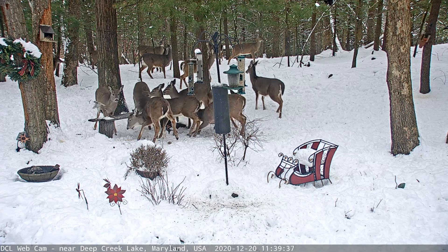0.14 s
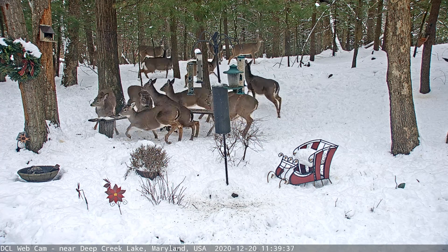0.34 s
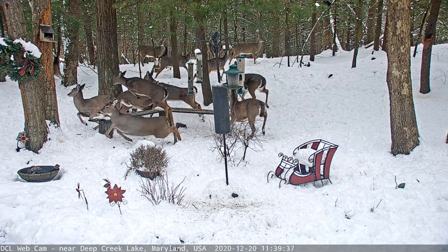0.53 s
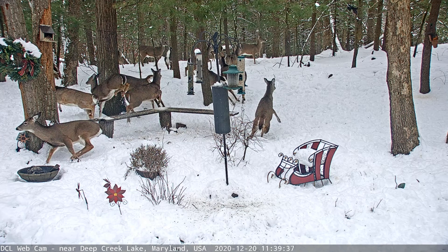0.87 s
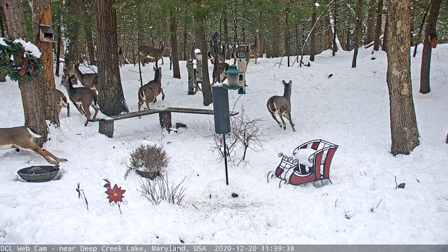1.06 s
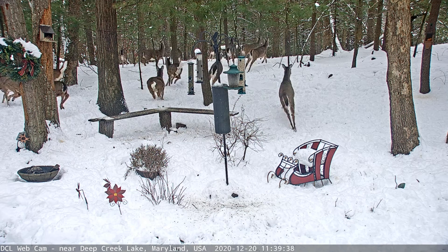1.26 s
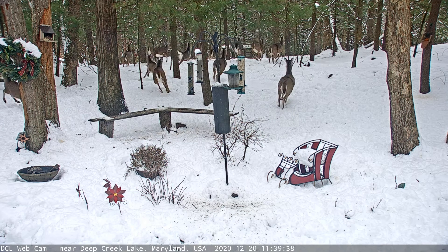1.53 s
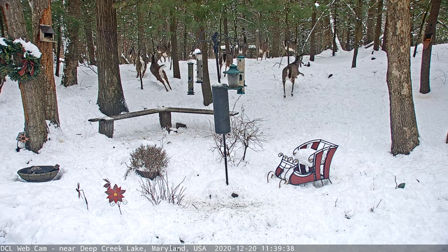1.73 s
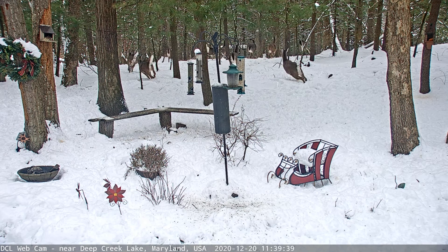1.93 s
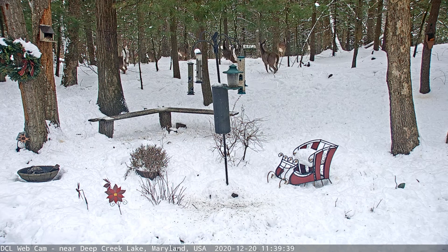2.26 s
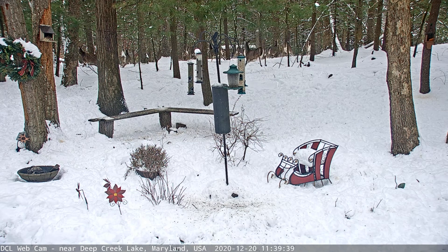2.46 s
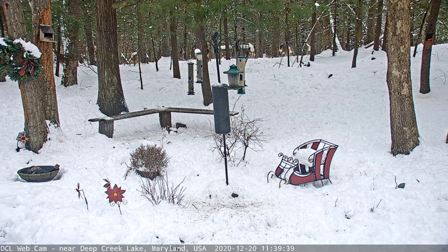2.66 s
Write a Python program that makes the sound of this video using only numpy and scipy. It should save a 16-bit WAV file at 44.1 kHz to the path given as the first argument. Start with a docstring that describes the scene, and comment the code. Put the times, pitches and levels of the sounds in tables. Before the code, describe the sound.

Close outdoor microphone with limited treble: crusty snow crunches like deer footfalls, lumps knock a roof, a heavy ice sheet rumbles and scrapes down in an overloaded roar, then late thumps and crackling over thinning hiss.

```python
"""Close to an outdoor camera, icy snow hisses and crunches in gritty noise bursts, with a few ringing ice chips,
dull low thumps like footfalls, and a deep throb that shakes the microphone.
Lumps then knock the roof, and a sheet of snow and ice breaks loose: the roof resonances drum and rumble
under random bumps and scrapes, the noise-grain hiss swells, and the narrow-band microphone clips.
Dull low thumps return as the slide ends and after it; crunches and chips crackle on over thinning hiss."""
import sys
import numpy as np
from scipy import signal
from scipy.fft import rfft, irfft, next_fast_len
from scipy.io import wavfile
from scipy.ndimage import uniform_filter1d, map_coordinates

SR = 44100
rng = np.random.default_rng(int(sys.argv[2]) if len(sys.argv) > 2 else 0)


def to_wav(sig):
    """Store sig (one row per channel, or 1-D mono) as 16-bit WAV at the path in sys.argv[1].

    Samples outside -1..1 are clipped; the rate is SR.
    """
    pcm = np.clip(np.atleast_2d(sig), -1, 1) * 32767
    pcm = np.round(pcm).astype(np.int16)
    wavfile.write(sys.argv[1], SR, pcm.T)  # frames by channels


N = 125685  # length in samples


def amp(db):
    """dB to gain."""
    return 10 ** (np.asarray(db) / 20)


def unit(x):
    """Scale to rms 1."""
    return x / np.sqrt(np.mean(x ** 2) + 1e-20)


def along(points, hz):
    """Read (freq_hz, value) points on a log frequency axis."""
    freq_hz, value = np.transpose(points)
    return np.interp(np.log(hz + 1), np.log(freq_hz + 1), value)


def level(rows):
    """Gain per sample from (time_s, level_db) rows; silent outside them unless they reach the scene's ends."""
    time_s, level_db = np.transpose(rows)
    before = level_db[0] if time_s[0] < .05 else -120
    after = level_db[-1] if time_s[-1] > 2.8 else -120
    return amp(np.interp(np.arange(N) / SR, time_s, level_db, left=before, right=after))


def wobble(rate):
    """A smooth random curve with rate knots a second."""
    knots = rng.standard_normal(int(N * rate / SR) + 4)
    return map_coordinates(knots, [np.arange(N) * rate / SR])


def filtered(x, response):
    """Multiply the spectrum of x by a response of frequency."""
    size = next_fast_len(N + SR // 2)
    hz = np.fft.rfftfreq(size, 1 / SR)
    return irfft(rfft(x, size) * response(hz), size)[..., :N]


def coloured(x, spectrum):
    """Shape x with a spectrum that rolls off at both ends, at rms 1."""
    lo, hi = spectrum[0][0], spectrum[-1][0]

    def response(hz):
        low_edge = 1 / (1 + (lo / 2 / (hz + 1)) ** 4)
        high_edge = 1 / (1 + (hz / (1.4 * hi)) ** 8)
        return amp(along(spectrum, hz)) * low_edge * high_edge

    return unit(filtered(x, response))


def grit(per_s, spread_db, smooth_share):
    """Random clicks of uneven size mixed with smooth noise, which takes smooth_share of the power."""
    chance = rng.random(N)
    size, sign, smooth = rng.standard_normal((3, N))
    clicks = unit((chance < per_s / SR) * amp(spread_db * size) * np.sign(sign))
    return np.sqrt(1 - smooth_share) * clicks + np.sqrt(smooth_share) * smooth


def patchy(x, depth_db, size):
    """Give x random gain in patches of time and frequency, using frames of size samples."""
    frames = signal.stft(x, nperseg=size)[2]
    field = uniform_filter1d(rng.standard_normal(frames.shape), size=3, axis=0)
    field = uniform_filter1d(field, size=4, axis=1)
    return unit(signal.istft(frames * amp(depth_db * unit(field)), nperseg=size)[1][:N])


def struck(rows, t60_s):
    """A dying sine for each (start_s, peak_db, pitch_hz)."""
    t = np.arange(N) / SR
    tones = np.zeros(N)
    for start_s, peak_db, pitch_hz in rows:
        decay = amp(peak_db - 60 * np.abs(t - start_s) / t60_s)
        tones += (t >= start_s) * decay * np.sin(2 * np.pi * pitch_hz * (t - start_s))
    return tones


def clip(x, top, hard):
    """Flatten what passes the top; a higher hard makes a sharper corner."""
    return x / (1 + np.abs(x / top) ** hard) ** (1 / hard)


# deep throb over time: [time_s, level_db]
THROB_LEVEL = [(0.0, -21.5), (0.2, -35.5), (0.38, -18.5), (0.52, -31.5), (.7, -14.5), (1.7, -10),
               (2.03, -16.5), (2.15, -13), (2.4, -22), (2.5, -18), (2.67, -28.5), (2.85, -30.5)]
# relative spectrum of the noise behind the throb: [freq_hz, density_db per Hz]
THROB_SPECTRUM = [(14, -6), (28, -1.5), (50, -5), (100, -22.5)]
THROB_EVEN = 0.34  # 0 swings like noise, 1 nearly steady


def throb():
    """Deep noise divided by part of its own envelope, so it swings more steadily than plain noise."""
    sway = coloured(rng.standard_normal(N), THROB_SPECTRUM)
    even = sway / (np.abs(signal.hilbert(sway)) + .2) ** THROB_EVEN
    top_hz = THROB_SPECTRUM[-1][0]
    return unit(filtered(even, lambda hz: 1 / (1 + (hz / top_hz) ** 6))) * level(THROB_LEVEL)


# low rumble that outlasts the slide: [time_s, level_db], before its swell
RUMBLE_LEVEL = [(0, -45), (.2, -49), (.25, -30.5), (.5, -39), (.55, -24.5), (.72, -20), (1.5, -2.5),
                (2.02, -20), (2.25, -24.5), (2.35, -30.5), (2.57, -34.5), (2.85, -47)]
# relative rumble spectrum: [freq_hz, density_db per Hz]
RUMBLE_SPECTRUM = [(60, -4), (100, 1.5), (160, -3.5), (400, -7), (560, -33.5)]


def rumble():
    """Low noise around the slide, swelling at random."""
    swell = amp(1.63 * wobble(20))
    return coloured(rng.standard_normal(N), RUMBLE_SPECTRUM) * level(RUMBLE_LEVEL) * swell


# hiss of moving snow: [time_s, level_db], before its flutter
HISS_LEVEL = [(0, -30.5), (.3, -27), (.47, -25), (.56, -30), (.62, -21.5), (.7, -15), (.85, -4), (1.4, 0.5),
              (1.95, -8), (2.1, -10), (2.2, -17.5), (2.33, -17), (2.4, -20.5), (2.52, -22), (2.69, -29.5),
              (2.85, -31)]
# relative hiss spectrum: [freq_hz, density_db per Hz]
HISS_SPECTRUM = [(260, -62), (450, -24), (835, -15.5), (983, -19), (2770, -13.5), (5330, -5.5),
                 (7300, -1.5), (9490, -5.5), (16100, -120)]
# icy grains, shared with the crunches; GRAIN_SHARE is the clicks' part of the power
GRAINS_PER_S, GRAIN_SPREAD_DB, GRAIN_SHARE = 4000, 4.5, 0.36
HISS_PATCH_DB, HISS_FLUTTER_DB = 1.5, 0.5


def hiss():
    """Fine icy grains of moving snow, patchy and fluttering in strength."""
    grains = grit(GRAINS_PER_S, GRAIN_SPREAD_DB, 1 - GRAIN_SHARE)
    fine = patchy(coloured(grains, HISS_SPECTRUM), HISS_PATCH_DB, size=128)
    flutter = amp(HISS_FLUTTER_DB * (wobble(30.1) + wobble(120)))
    return fine * level(HISS_LEVEL) * flutter


# crunches of crusted snow: [start_s, nominal peak_db, rise_s, t60_s, body_db (dull body against bright top)]
CRUNCH_BURSTS = [(0.069, -10, 0.0012, 0.024, -3), (0.096, -9, 0.001, .025, -8),
                 (0.111, -10, 0.0018, 0.045, -9), (0.168, -4, 0.0006, 0.042, 2),
                 (0.195, -14, 0.005, 0.076, 0), (0.216, -1, .012, 0.15, -2.5),
                 (0.235, -4.5, 0.0024, 0.1, -2.5), (.26, 2, 0.008, 0.078, 3.5),
                 (0.304, -6, 0.0024, 0.028, -13), (0.311, 0, 0.0063, 0.08, 2),
                 (0.342, -6.5, 0.0011, 0.071, -13), (0.354, -6.5, 0.0052, 0.18, 3),
                 (0.381, 0, 0.004, 0.078, 9), (0.4048, 1.5, 0.00078, 0.077, -12.5),
                 (0.423, -3.5, 0.0022, .06, 2), (0.504, -3, 0.0022, 0.066, -4),
                 (0.517, -10.5, 0.0033, 0.13, 5), (.592, -12.5, 0.0016, 0.23, 6),
                 (2.03, 16.5, 0.0035, 0.042, 10.5), (2.286, 3.5, 0.0025, 0.042, -18),
                 (2.529, -3.5, 0.00056, 0.053, -4.5), (2.561, -8, 0.0031, 0.04, -10),
                 (2.596, -13, 0.0022, 0.044, -2), (2.62, -12, 0.0027, 0.1, -17),
                 (2.641, -10.5, 0.0018, .07, -7.5), (2.653, -9, 0.0015, 0.063, -18),
                 (2.67, -8, 0.0018, 0.053, -7), (2.699, -14, 0.0026, 0.093, -7),
                 (2.715, -14, 0.0027, 0.13, -4), (2.758, -11, 0.002, 0.06, 0),
                 (2.782, -17.5, 0.0047, 0.066, 12), (2.823, -6, 0.001, 0.032, -9.5)]
# relative spectrum of the crunch grains before the body balance: [freq_hz, density_db per Hz]
CRUNCH_SPECTRUM = [(300, -30), (560, -21.5), (800, -10), (1800, -10.5), (3200, -11), (4800, -4),
                   (6500, 0.5), (7300, 1)]
CREST_DB = 6  # allowance for noise peaks above rms
CRUNCH_PATCH_DB, CRUNCH_GRIT_DB = 3, 2.5
BODY_HZ = 3000  # split between dull body and bright top


def crunches():
    """Crusted snow in short gritty bursts: a quick rise, then a fall; each has its own share of dull body."""
    t = np.arange(N) / SR
    top_power, body_power = np.zeros(N), np.zeros(N)
    for start_s, peak_db, rise_s, t60_s, body_db in CRUNCH_BURSTS:
        age = np.maximum(t - start_s, 0)
        rise = 1 - np.exp(-(age / rise_s) ** 2)
        power = (amp(peak_db - CREST_DB - 60 * age / t60_s) * rise) ** 2
        top_power += power
        body_power += power * amp(2 * body_db)
    grains = grit(GRAINS_PER_S, GRAIN_SPREAD_DB, 1 - GRAIN_SHARE)
    texture = patchy(coloured(grains, CRUNCH_SPECTRUM), CRUNCH_PATCH_DB, size=128)
    body = filtered(texture, lambda hz: 1 / (1 + (hz / BODY_HZ) ** 4))
    bursts = (texture - body) * np.sqrt(top_power) + body * np.sqrt(body_power)
    return bursts * amp(CRUNCH_GRIT_DB * wobble(610))


# ice chips that ring: [start_s, peak_db, pitch_hz]
CHIP_HITS = [(.135, -17.5, 4650), (.428, -16, 1970), (2.291, -7.5, 5470), (2.53, -7.5, 5360)]


def chips():
    """Ice chips ring briefly, each at a single high pitch."""
    return struck(CHIP_HITS, t60_s=.025)


# dull low thumps: [start_s, peak_db, pitch_hz]
THUMP_HITS = [(.233, -14, 113), (.355, -21, 120), (1.978, -7.5, 327), (2.167, -2.5, 328), (2.438, -23, 84),
              (2.487, -16.5, 83), (2.546, -17, 132), (2.7, -23, 110), (2.77, -31.5, 401)]


def thumps():
    """Dull low dying sines, first under the early crunches like footfalls, later as the slide ends and after."""
    return struck(THUMP_HITS, t60_s=.09)


# the sheet on the roof: [time_s, rumble_db, upper_db (upper resonances against the rumble)], before its swell
SLIDE_LEVEL = [(0.559, -27, 2), (.6, -15.5, -6), (.64, -12.5, -2.5), (0.677, -6.5, -2), (.85, 0, -4),
               (1.14, 2, -0.5), (1.39, 1, 0.5), (1.55, -2.5, 4), (1.72, -4.5, 3), (1.8, -12, 5),
               (1.886, -16, 4), (1.99, -8, 2), (2.145, -9.5, -2.5), (2.162, -30.5, 9), (2.175, -13, 3.5),
               (2.215, -34, -3)]
# relative roof resonances: [pitch_hz, width_hz, level_db]
ROOF_MODES = [(101.6, 102, -5), (161, 77, 1), (289.7, 81.5, 1.5), (394.4, 70, 1.5), (481, 100, -6),
              (766, 109, -6.5), (923, 120, -6.5), (1383, 124, -5), (1591, 147, -5.5), (1996, 460, -12),
              (2665, 360, -10)]
# single lumps knocking the roof: [start_s, peak_db]
KNOCK_HITS = [(0.5356, -7.5), (0.5424, -16), (0.567, -9.5), (0.5922, -6.5), (0.6061, -9), (0.615, -7),
              (2.1745, -11.5)]
LUMPS_PER_S, LUMP_SPREAD_DB = 900, 4.5
SCRAPE_SHARE = 0.82  # smooth scraping's part of the push power
SLIDE_PATCH_DB, SLIDE_SWELL_DB = 2, 1
ROOF_DULL_HZ, UPPER_HZ = 2700, 600  # softness of the push; split between rumble and upper resonances
CONTACT_S = 0.0011  # time a knocking lump touches the roof


def roof_ring(hz):
    """Response of the roof: resonances side by side with alternating sign."""
    total = 0
    for k, (pitch_hz, width_hz, level_db) in enumerate(ROOF_MODES):
        damping = 1j * hz * width_hz
        total = total + (-1) ** k * amp(level_db) * damping / (pitch_hz ** 2 - hz ** 2 + damping)
    return total


def roof_slide():
    """Lumps bumping and ice scraping along the roof push softly on its resonances."""
    push = patchy(grit(LUMPS_PER_S, LUMP_SPREAD_DB, SCRAPE_SHARE), SLIDE_PATCH_DB, size=512)
    drumming = unit(filtered(push, lambda hz: roof_ring(hz) / (1 + 1j * hz / ROOF_DULL_HZ) ** 2))
    upper = filtered(drumming, lambda hz: 1 / (1 + (UPPER_HZ / (hz + 1)) ** 6))
    time_s, rumble_db, upper_db = np.transpose(SLIDE_LEVEL)
    low_gain = level(np.c_[time_s, rumble_db])
    upper_gain = level(np.c_[time_s, rumble_db + upper_db])
    moving = (drumming - upper) * low_gain + upper * upper_gain
    return moving * amp(SLIDE_SWELL_DB * wobble(24.92))


def roof_knocks():
    """Each single lump gives the roof a short rounded push that rings the same resonances."""
    t = np.arange(N) / SR
    contact = (t < CONTACT_S) * np.sin(np.pi * t / CONTACT_S) ** 2
    knock = filtered(contact, roof_ring)[:SR // 4]
    blows = np.zeros(N)
    for start_s, peak_db in KNOCK_HITS:
        blows[round(start_s * SR)] = amp(peak_db)
    return signal.fftconvolve(blows, knock / np.abs(knock).max())[:N]


def scene():
    """Mix all sources to mono, from the background to the roof."""
    background = throb() + rumble()
    details = hiss() + crunches() + chips() + thumps()
    return (background + details + roof_slide() + roof_knocks())[None]


# treble limit of the microphone: [freq_hz, gain_db]
MIC_TREBLE = [(7200, 1.5), (7900, -17.5), (8700, -22), (9200, -40), (9600, -80)]
INPUT_CLIP, INPUT_HARD, OUTPUT_CLIP, OUTPUT_HARD = 0.55, 16, 0.72, 11
COUPLING_HZ, TOP_HZ = 20.6, 15850  # bass roll-off and final treble cutoff


def record(dry):
    """The input clips and sags through its coupling, the narrow band cuts treble, the output clips overshoot."""
    def band(hz):
        coupling = 1j * hz / (COUPLING_HZ + 1j * hz)
        return amp(along(MIC_TREBLE, hz)) * coupling

    narrow = filtered(clip(dry, INPUT_CLIP, INPUT_HARD), band)
    return filtered(clip(narrow, OUTPUT_CLIP, OUTPUT_HARD), lambda hz: hz < TOP_HZ)


dry = scene()
out = record(dry)
to_wav(out)
```